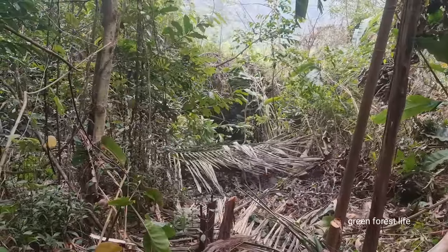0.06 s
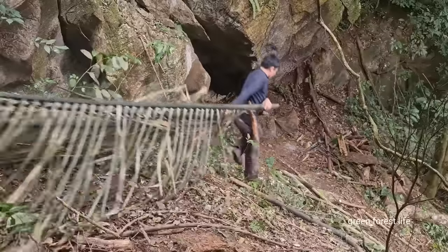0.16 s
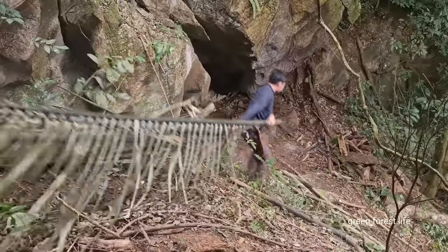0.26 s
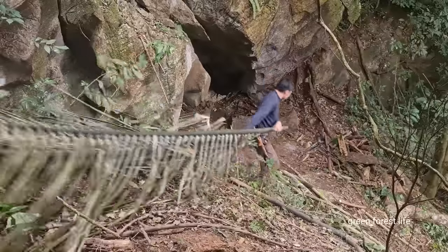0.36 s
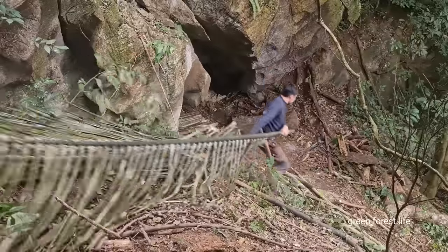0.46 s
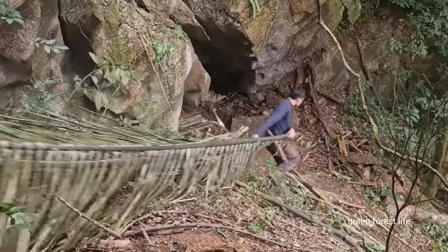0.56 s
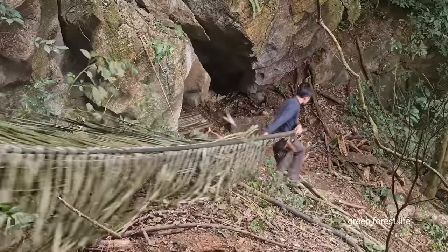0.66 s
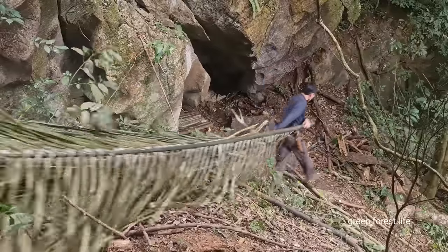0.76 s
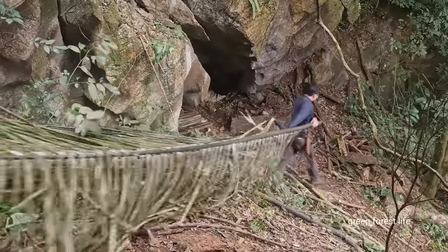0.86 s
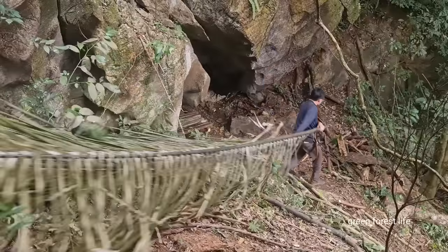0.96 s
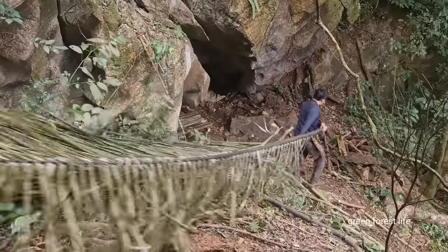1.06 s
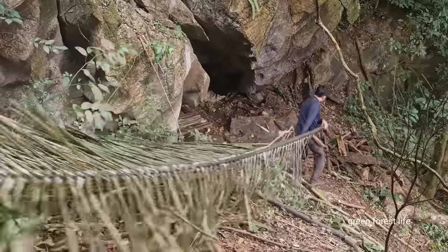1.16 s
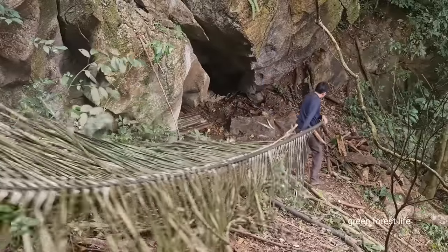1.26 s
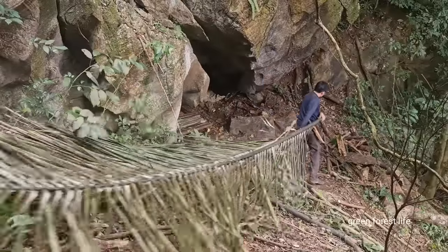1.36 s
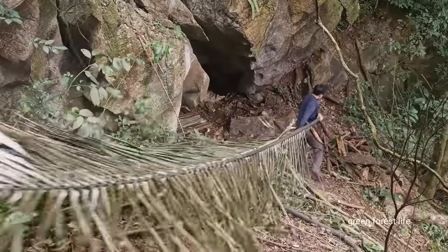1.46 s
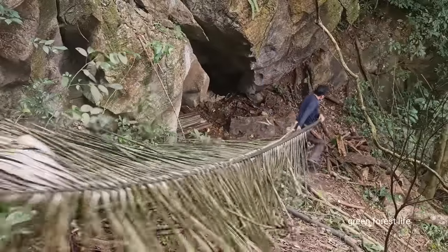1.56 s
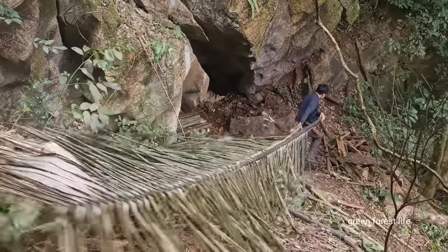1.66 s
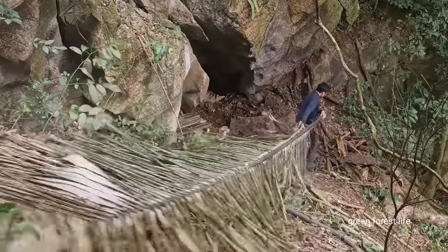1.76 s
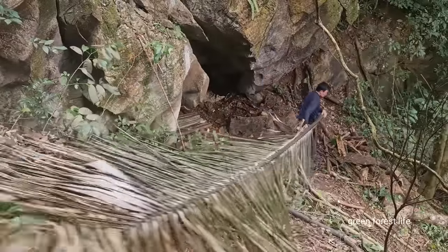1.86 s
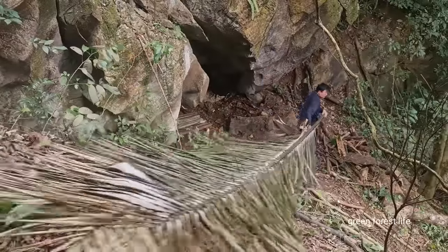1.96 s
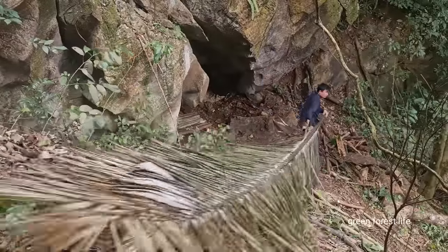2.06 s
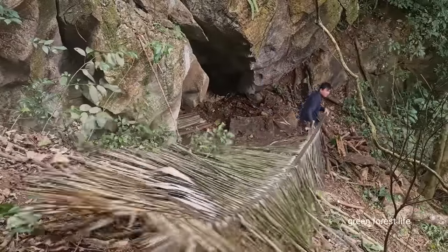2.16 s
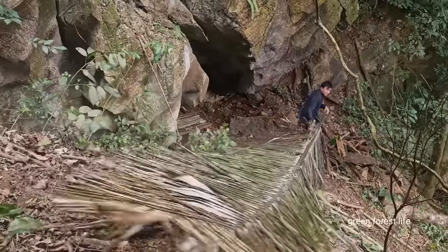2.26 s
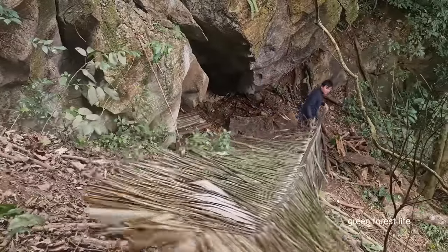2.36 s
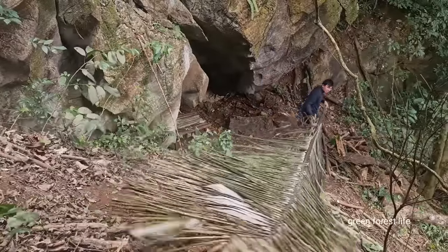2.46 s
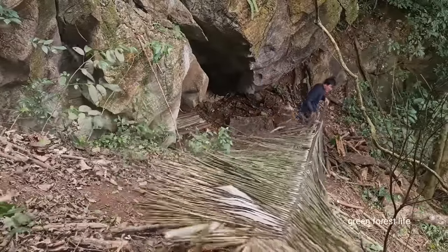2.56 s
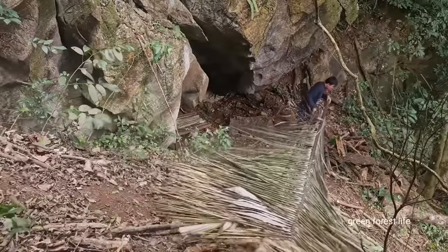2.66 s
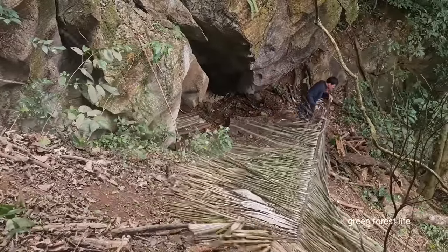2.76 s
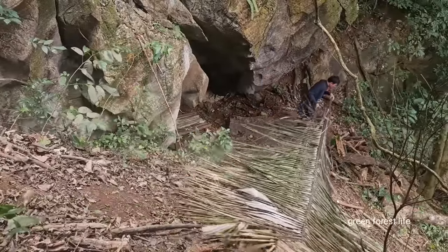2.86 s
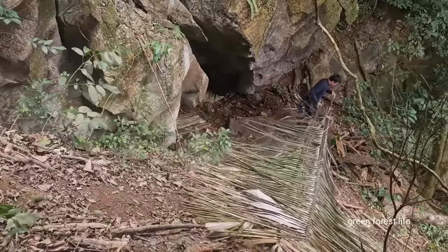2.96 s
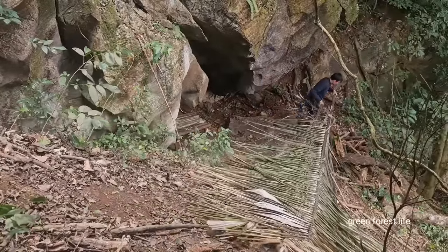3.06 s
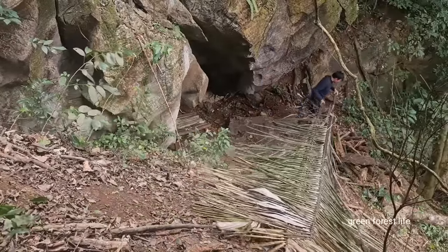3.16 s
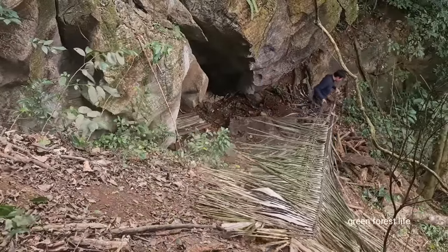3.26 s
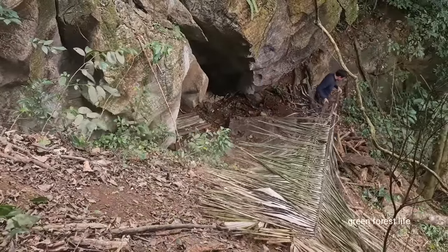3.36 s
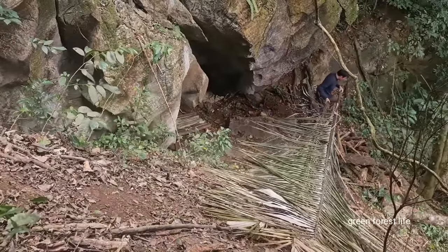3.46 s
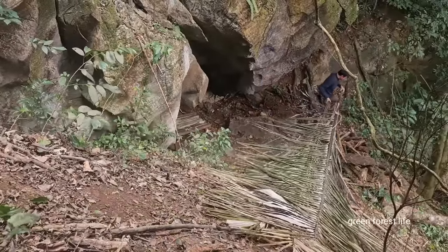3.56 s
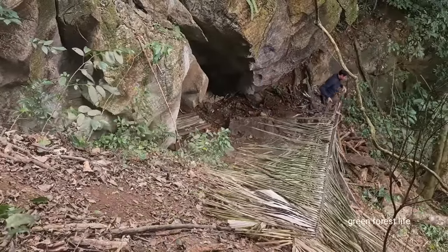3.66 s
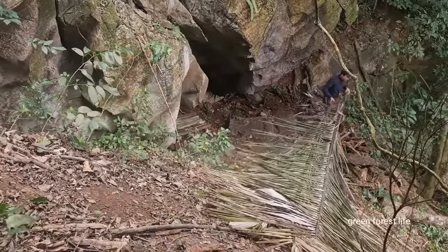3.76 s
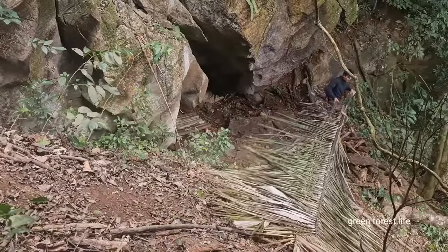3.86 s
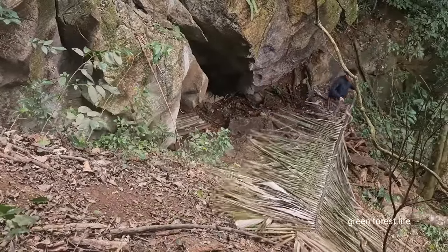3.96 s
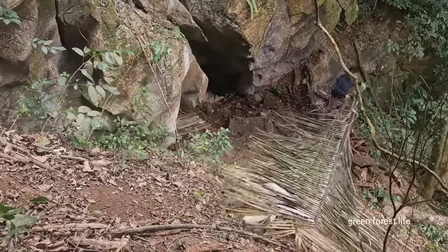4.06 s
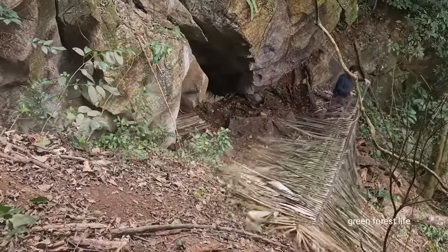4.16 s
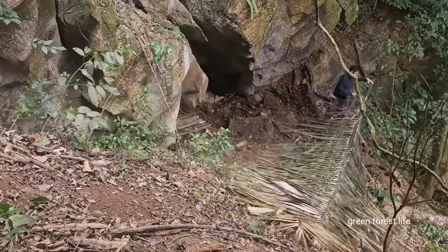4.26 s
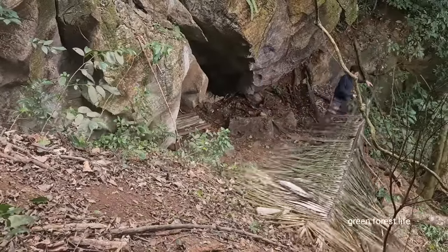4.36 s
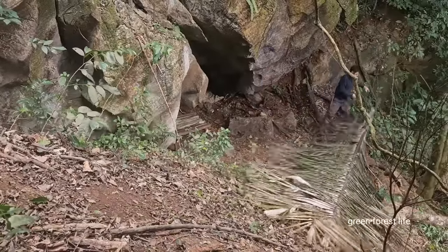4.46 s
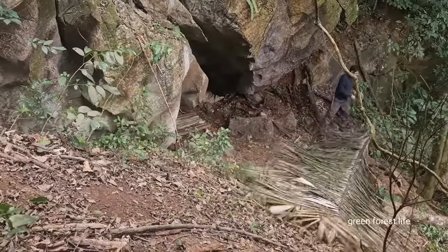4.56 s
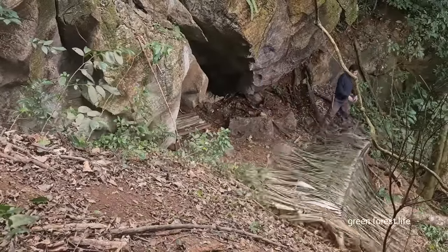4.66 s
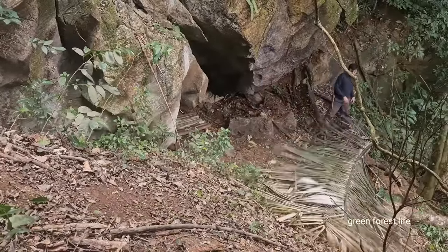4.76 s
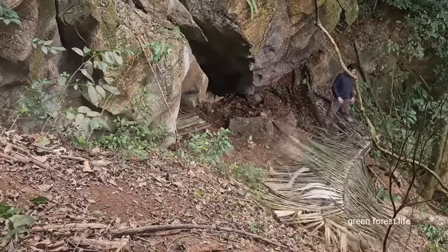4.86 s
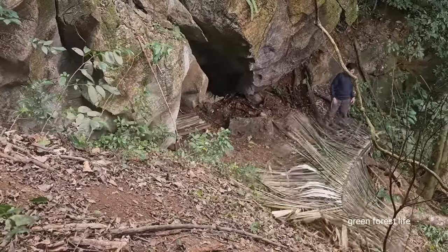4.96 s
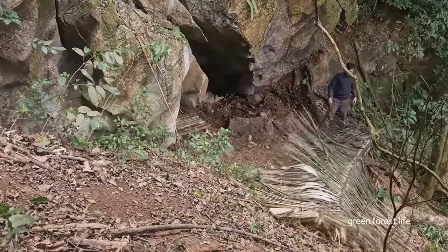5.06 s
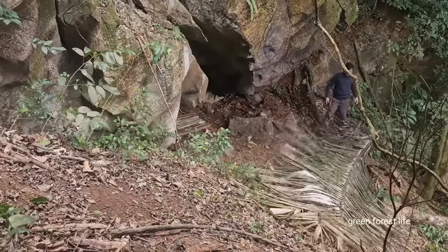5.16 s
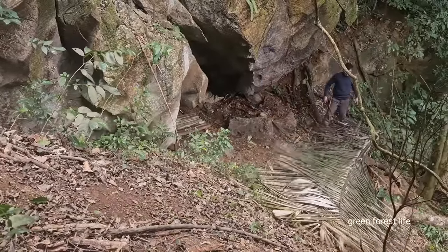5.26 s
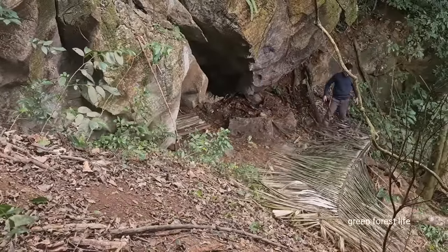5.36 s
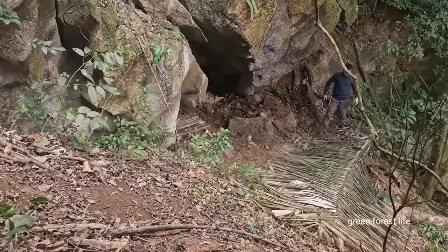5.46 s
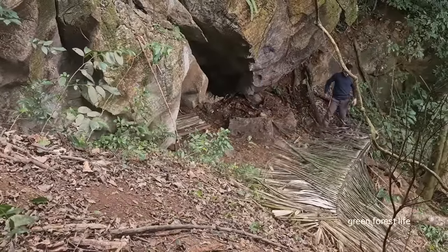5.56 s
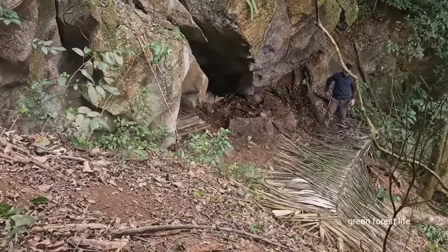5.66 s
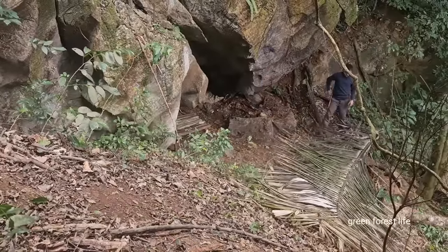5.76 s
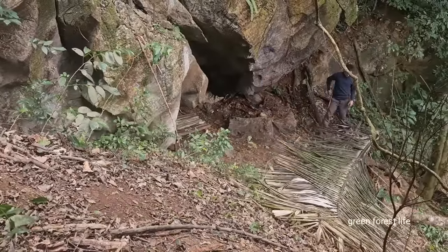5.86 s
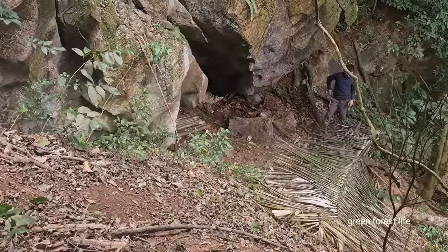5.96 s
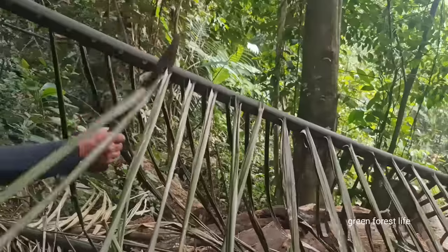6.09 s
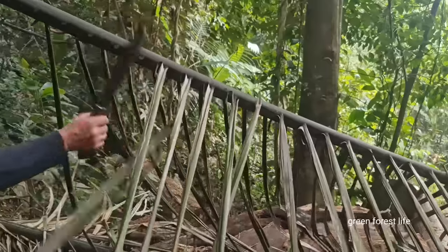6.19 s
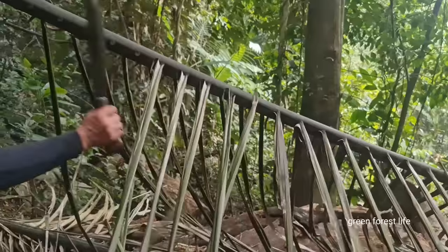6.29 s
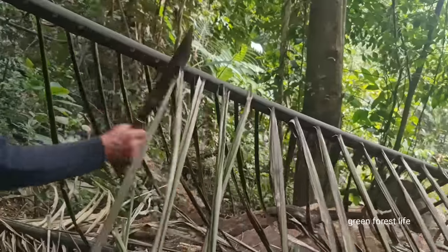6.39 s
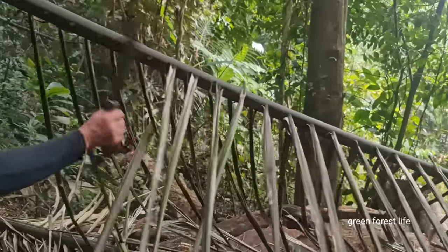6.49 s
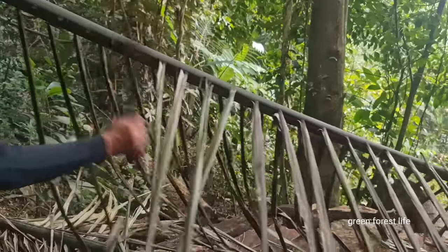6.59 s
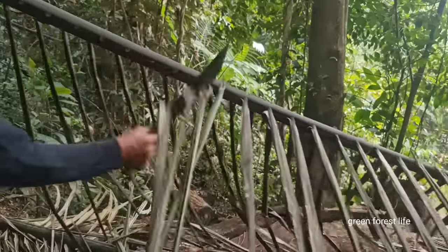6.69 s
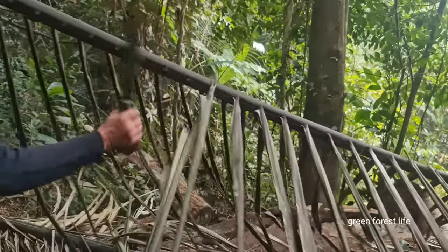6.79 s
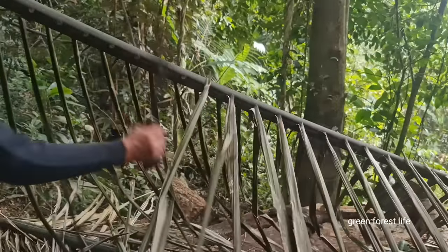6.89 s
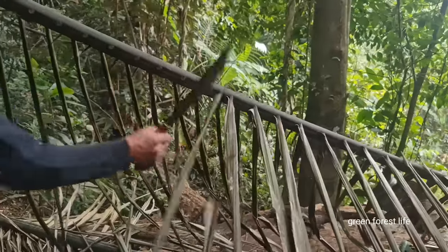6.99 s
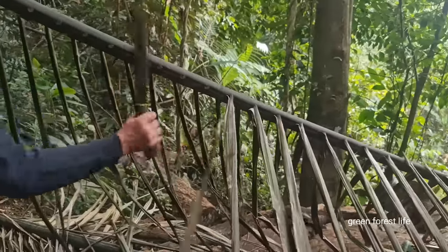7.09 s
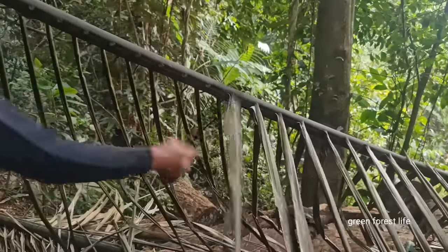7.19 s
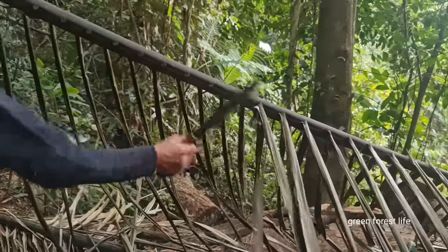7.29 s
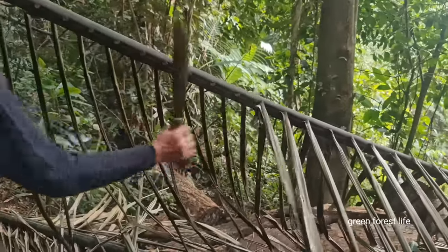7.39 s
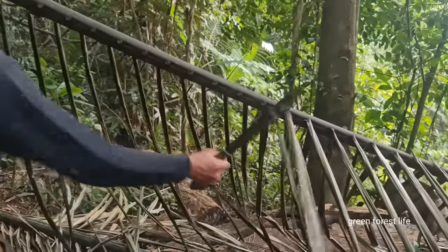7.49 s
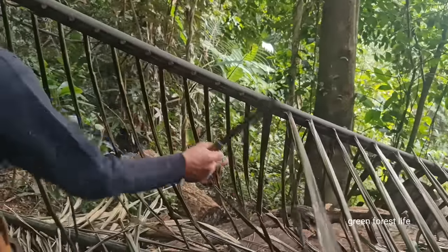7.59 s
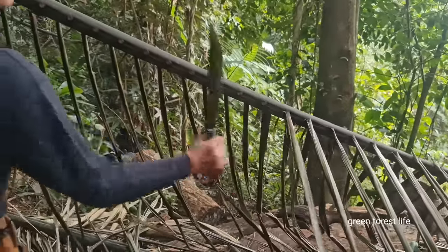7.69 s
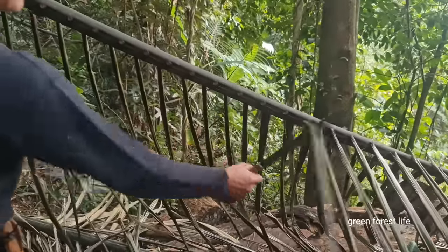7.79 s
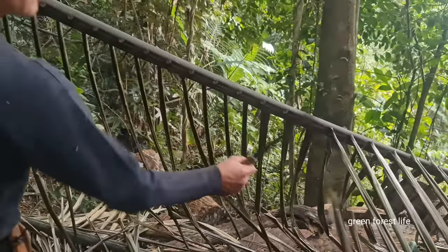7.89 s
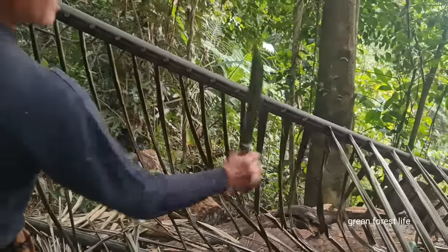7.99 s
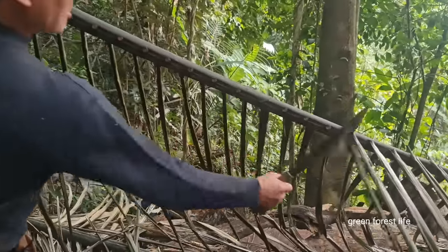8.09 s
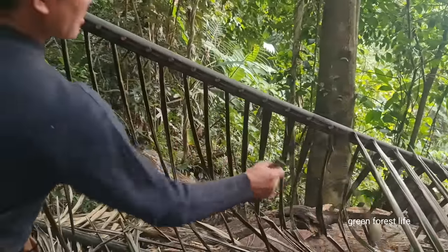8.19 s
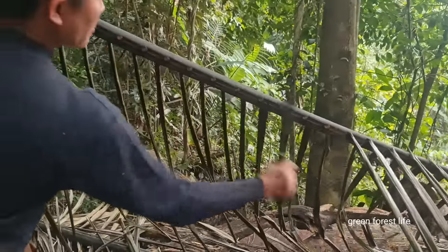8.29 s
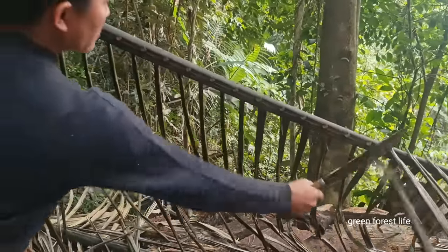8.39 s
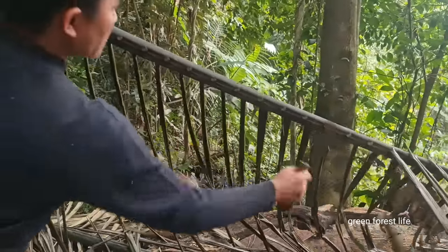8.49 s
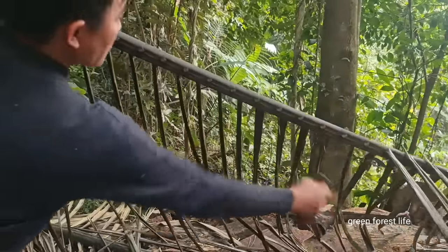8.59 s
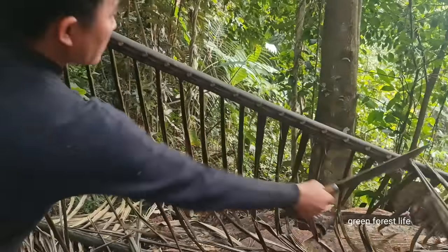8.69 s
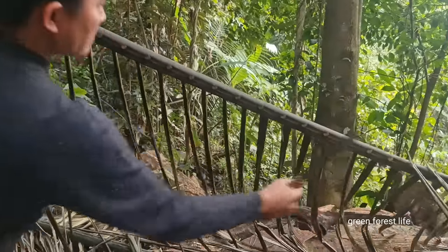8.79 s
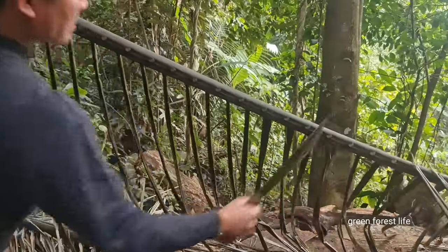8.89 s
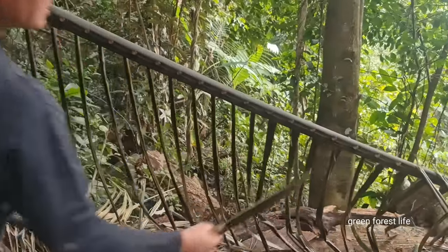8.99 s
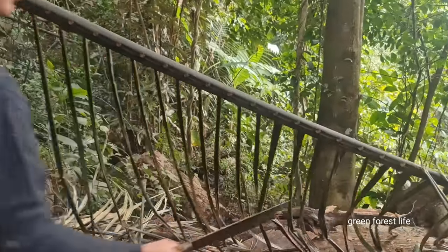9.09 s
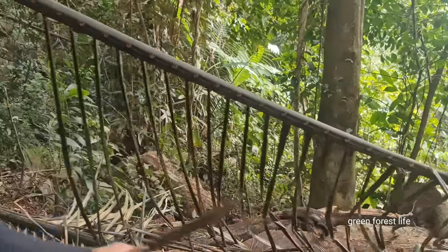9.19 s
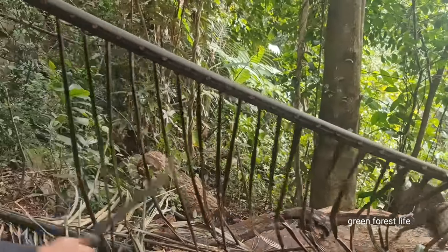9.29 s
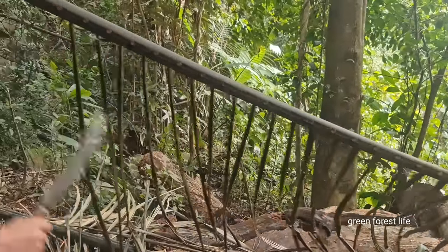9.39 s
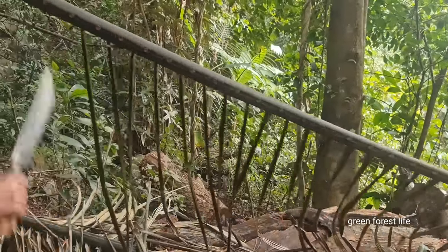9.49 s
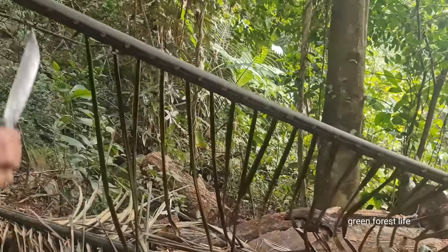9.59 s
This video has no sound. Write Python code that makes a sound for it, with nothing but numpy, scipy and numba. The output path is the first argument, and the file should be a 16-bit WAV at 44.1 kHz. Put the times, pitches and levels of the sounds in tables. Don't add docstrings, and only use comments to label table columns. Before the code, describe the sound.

A big dry palm frond is dragged rustling over leaf litter and fades away, then a machete rapidly chops leaflets off its rib close by.

```python
import sys
import numpy as np
from scipy import signal
from scipy.fft import rfft, irfft
from scipy.io import wavfile
from scipy.ndimage import uniform_filter1d
from numba import njit

SR = 44100
rng = np.random.default_rng(int(sys.argv[2]) if len(sys.argv) > 2 else 0)


def volts_from_db(level):
    exponent = np.asarray(level, float) / 20
    return 10 ** exponent


def store_wav(level_fs):
    pcm = np.round(np.clip(np.atleast_2d(level_fs), -1, 1) * 32767)
    wavfile.write(sys.argv[1], SR, pcm.T.astype(np.int16))


N = 425124
CLOSE_S = 6.2

# (tips level/dB, stems level/dB, soil level/dB)
FAR_SHARES = (-8, -12.5, -29.5)
NEAR_SHARES = (-7.5, -9.5, -24.5)


def rustle():
    t = np.arange(N) / SR
    pull, heavy = motion()
    close = np.arange(N) > CLOSE_S * SR
    tips_db, stems_db, soil_db = (np.where(close, near, far) for far, near in zip(FAR_SHARES, NEAR_SHARES))
    blows_end_s, resting_soil_db = 8.8, -37
    soil_db = np.where(np.arange(N) > blows_end_s * SR, resting_soil_db, soil_db)
    air_db_per_s = -0.28
    tips_db = tips_db + 10.0 + air_db_per_s * t * ~close - 1.5 * close

    blades = volts_from_db(-1.0) * litter(1118.0, 6840.0, 7.9, 0.31, 0.97, count=60000)
    tips = volts_from_db(tips_db) * litter(6400.0, 16900.0, 2.7, 0.26, 0.78, count=60000)
    stems = volts_from_db(stems_db + 2.5) * litter(218.0, 905.0, 20.5, 1.1, 0.13, count=10000)
    soil = volts_from_db(14.5) * litter(36.0, 210.0, 4.4, 0.6, 2.2, count=1500)
    landing = volts_from_db(-11.0) * close * litter(685.0, 4130.0, 26.0, 1.3, 4.4, count=4000)

    jerk = volts_from_db(0.5 * walk(rate=40))
    ground_db = -88
    soil_motion = np.hypot(heavy * volts_from_db(soil_db), volts_from_db(ground_db))
    return jerk * (pull * (blades + tips + landing) + heavy * stems + soil_motion * soil)


# (t/s, pull level/dB, weight of the rib on the ground level/dB)
DRAG = [(0.237, -43, -4), (0.254, -29, 1.5), (0.31, -21, 0.5), (0.55, -17.5, 2), (1.0, -22, 2),
        (1.8, -24.5, 0.5), (2.6, -27.5, -2.5), (3.0, -33, -0.5), (3.45, -38.5, 0.7), (3.66, -45, 0.5),
        (3.92, -33.5, -1), (4.27, -27, -2.5), (4.53, -29.5, -3), (4.68, -25, -3), (4.96, -40.5, -4),
        (5.3, -43, -6), (5.53, -58.5, 1.5), (6.0, -70, 4)]
# (peak t/s, level/dB, swell t60/s, fade t60/s,
# weight level/dB)
LEAF_SWELLS = [(6.206, -52, 0.011, 4.4, 7.5), (6.3, -41, 0.63, 0.6, -5), (8.025, -46, 0.014, 0.35, 3),
               (8.6, -43, .08, 0.37, -8), (7.72, -43, 0.05, 0.14, 7), (6.42, -32, 0.35, 1.37, -2.5),
               (6.64, -33.5, 0.29, 1.7, -1.5), (6.72, -41, .1, 1.6, -6), (6.92, -33, 1.2, 0.64, -7),
               (7.01, -28.5, 0.2, 0.07, -1.5), (7.104, -32.5, 0.44, 0.067, -4), (7.206, -39, 0.042, 1.2, 1),
               (7.29, -33, 0.16, 1.2, -3), (7.43, -34.5, 0.44, 0.95, 1), (7.58, -42, 0.17, 0.28, 11.5),
               (7.63, -35, 0.1, 0.25, 0.5), (7.75, -62, 1.1, 1.3, 11), (7.859, -27.5, 0.27, 0.2, 2),
               (7.93, -42.5, 0.11, 0.68, 4.5), (8.06, -45, 0.2, 3.1, -8), (8.16, -30, 0.5, 0.18, -2),
               (8.3, -46, 1.7, 0.64, 7), (8.45, -38, 0.12, 0.46, 6), (8.51, -36.5, 0.97, 0.21, -9),
               (8.65, -36.5, 0.37, 0.65, 4.5), (8.71, -41.5, .1, 0.84, 3), (8.78, -37.5, 1.2, .3, -12),
               (0.005, -36, 0.13, 0.51, -0.5), (0.16, -48, 1.5, 0.84, 1), (1.32, -23, 0.27, 0.16, -4),
         (3.505, -37, .03, 0.4, -2), (5.28, -42.5, .25, 0.18, 6), (5.4, -51, 0.084, 0.14, 7),
         (5.79, -64, 1, 0.34, -7), (6.074, -52, .02, 0.2, 11), (1.785, -25, 0.17, 0.38, 3),
         (5.225, -46, .2, 0.22, 5), (3.91, -33.5, 0.16, 0.14, 0), (8.93, -40.5, 0.22, 0.54, 4),
         (9.12, -47.5, 1.5, 0.46, -4), (9.33, -44, 1, 3, 2.5), (9.42, -41.5, 1.3, 5, 3.5),
         (9.62, -40.5, 1.6, 0.77, -11)]


def motion():
    t = np.arange(N) / SR
    s, pull_db, weight_db = np.transpose(DRAG)
    power = volts_from_db(2 * np.interp(t, s, pull_db, left=-90))
    heavy = power * volts_from_db(2 * np.interp(t, s, weight_db))
    for peak_s, level_db, swell, fade, weight_db in LEAF_SWELLS:
        rising = (peak_s - t) / max(swell, 0.01)
        fading = (t - peak_s) / max(fade, 0.01)
        shape = volts_from_db(2 * (level_db - 60 * np.where(t < peak_s, rising, fading)))
        shape = shape * ((t > CLOSE_S) | (peak_s < CLOSE_S))
        power = power + shape
        heavy = heavy + shape * volts_from_db(2 * weight_db)
    return np.sqrt(power), np.sqrt(heavy)


def litter(low_hz, high_hz, cycles, uneven_db, patchy_db, count):
    when, pitch = rng.random((2, count))
    hz = low_hz + (high_hz - low_hz) * pitch
    size = np.sqrt(hz) * volts_from_db(uneven_db * rng.exponential(size=count))
    x = cracks(when * N / SR, hz, cycles, size, 6.0, 6.5, rng.standard_normal((2, count)))
    x = x * volts_from_db(patchy_db * walk(rate=25))
    return x / x.std()


def walk(rate):
    k = SR // rate
    held = np.repeat(rng.standard_normal(N // k + 1), k)
    return np.sqrt(2) * uniform_filter1d(uniform_filter1d(held, k), k)[:N]


# (t/s, fibre level/dB, wood and knock of the rib relative to fibre level/dB)
STALKS = [(6.0762, -44, -10, -12), (6.384, -13, -2, -21), (6.393, -30.5, 14.5, 7),
          (6.4057, -16.5, -14, -5.5), (6.572, -29.5, 9, -3), (6.67, -22, 0, -4), (6.681, -14, 0, -4.5),
          (6.698, -18, 4.5, -12), (6.9864, -15, 0, -14), (7.002, -29, -10, -26), (7.254, -12, -4, -9.5),
          (7.272, -21.5, -2, -2), (7.421, -23.5, -1.5, -22), (7.539, -15, -6, -1.5), (7.5515, -14.5, 1, -9),
          (7.569, -35, 4, -10), (7.82, -22, 12.5, -7), (7.834, -11.5, -1, -8.5), (8.108, -25.5, -7, 4.5),
          (8.121, -17, -18, -0.5), (8.133, -15, -5, -2.5), (8.152, -35, -5, -13), (8.395, -15.5, 2.5, 0.5),
          (8.408, -16, 1, -3), (8.422, -21, 5, 3), (8.4407, -25.5, -23, -7), (8.6696, -10, 0, -11),
          (8.681, -13.5, -16, 3), (8.692, -26, 0, -12), (8.9458, -37.5, 0, -1)]
# (t/s, fibre level/dB, skin relative to fibre level/dB)
NICKS = [(6.3357, -40, 14), (6.365, -31, 12), (6.465, -37.5, 14.5), (6.595, -44, 12), (6.913, -33, 9),
         (6.946, -29, 5.5), (6.968, -28, 6), (7.03, -40, 11), (7.188, -50, 6), (7.786, -40, 10),
         (7.805, -29, 0), (8.022, -44, 8), (8.051, -46, 11), (8.088, -25.5, 0), (8.32, -49, 12),
         (8.485, -36.5, 9), (9.115, -48.5, 12.5), (9.125, -46, 11), (9.527, -34, 2), (9.5324, -33, 3),
         (9.556, -41, 2.5)]


def cuts():
    skin_db, stiff_loss = -1, 0.12
    stalk_rise_s, burst_db = 0.0013, -0.5
    stalks = [(s, db, wood, knock, skin_db - stiff_loss * wood, stalk_rise_s, burst_db)
              for s, db, wood, knock in STALKS]
    wood_db, knock_db, thin = 1, 2, 0.99
    nick_rise_s, nick_burst_db = 0.0031, -3.0
    nicks = [(s, db, wood_db - thin * skin, knock_db - thin * skin, skin, nick_rise_s, nick_burst_db)
             for s, db, skin in NICKS]
    return stalks + nicks


def chops(count):
    s, fibre_db, wood_db, knock_db, skin_db, rise, burst_db = np.transpose(cuts())[:, :, None]
    kind = np.arange(count) % 4
    low_hz, high_hz = np.array([[2660, 8530], [924, 2020], [7600, 15300], [273, 860]])[kind].T
    hz = low_hz + (high_hz - low_hz) * rng.random((len(s), count))
    cycles = np.array([9.2, 3.7, 3.15, 9.4])[kind] + 0 * s
    share_db = np.choose(kind, [0 * s + 3, wood_db - 0.5, skin_db + 18, knock_db - 4.0])
    share_db = share_db + 10 * np.log10(2 * hz / (low_hz + high_hz))
    splinter_t60_s = 0.067
    return splinters(s, hz, fibre_db + share_db - 1.5, cycles, splinter_t60_s, rise, burst_db, 1.2, 2.2)


def splinters(s, hz, level_db, cycles, t60, rise, burst_db, crowd, spread):
    order = 1.15 * rng.random(hz.shape) - 0.12
    lag, shade, uneven = np.moveaxis(rng.standard_normal((*hz.shape, 3)), 2, 0)
    t60 = np.clip(t60, 0.003, 0.3)
    after = 0.6 * t60 * np.maximum(order, 0) ** crowd
    early = np.maximum(-order, 0) / 0.12
    burst_s = 0.0058
    burst = burst_db * np.exp(-after / burst_s)
    size = volts_from_db(level_db + burst - 60 * after / t60 - 17.5 * early + 2.35 * uneven)
    when = s + after - rise * early
    chance = np.array([lag.ravel(), shade.ravel()])
    return cracks(when.ravel(), hz.ravel(), cycles.ravel(), size.ravel(), spread, 12.7, chance)


# (t/s, level/dB, ring f/Hz, broad crack relative level/dB)
TWIGS = [(0.126, -47, 6400, 3), (0.523, -17, 5000, 2), (0.56, -17, 3000, 0), (1.329, -23, 3620, -5),
         (1.621, -24, 3000, 0), (1.643, -23, 2800, 0), (1.682, -12, 6340, -6), (1.709, -23, 6500, -2),
         (1.786, -19, 3000, -1), (2.685, -16, 1690, -3), (3.031, -31, 1010, 6), (3.053, -30, 2150, -5),
         (3.118, -30, 2150, -11), (3.124, -28, 1350, -3), (3.13, -32, 2050, -11), (3.209, -32, 2600, -3),
         (3.262, -30, 6700, -4), (3.279, -31, 3200, -10), (3.401, -31, 6800, -3), (3.502, -30, 6800, -6),
         (3.731, -41, 5040, 5), (3.902, -32, 1300, -3), (4.443, -33, 2780, 10), (4.615, -24, 4050, 4),
         (5.045, -33, 5900, -5), (5.216, -41, 760, -12), (5.218, -41, 1400, -10), (5.234, -38, 726, -8),
         (5.25, -41, 1600, -8), (5.278, -36, 3130, -5), (5.298, -41, 1400, -6), (5.398, -46, 2500, -10),
         (5.408, -46, 700, -4), (5.447, -43, 1700, -12), (5.47, -43, 1740, -12), (5.483, -46, 1600, -12),
         (5.975, -49, 1650, -11), (5.992, -58, 1600, -5), (6.0765, -37, 7200, -8), (6.085, -48, 2300, -6),
         (6.106, -39, 11500, -10), (6.134, -60, 1800, -3), (7.058, -34, 1500, 5), (8.778, -32, 2900, -1),
         (8.954, -36, 4000, -8), (8.975, -29, 1470, -17), (9.109, -41, 1000, 5), (9.172, -41, 1300, 4)]
# (t/s, level/dB, ring f/Hz)
TAPS = [(6.216, -35, 816), (6.244, -32, 830), (6.45, -27, 5340), (6.491, -26, 5200), (6.619, -31, 1300),
        (6.6417, -26, 1390), (7.099, -32, 1900), (7.198, -37, 1800), (7.2372, -29, 1740),
        (7.3083, -31, 1830), (7.348, -34, 1430), (7.3668, -22, 2820), (7.395, -30, 1720),
        (7.5212, -23, 890), (7.621, -27, 1400), (7.719, -39, 3140), (8.023, -46, 4500), (8.054, -41, 6720),
        (8.2556, -35, 3100), (8.3774, -36, 730), (8.4835, -35, 6630), (8.636, -37, 1700),
        (8.914, -39, 1510), (9.006, -42, 4030), (9.063, -40, 6730), (9.486, -38, 1510), (9.544, -36, 1500),
        (7.616, -28.5, 2850), (7.635, -31, 1600), (7.755, -37, 1300), (7.901, -40, 3020),
        (6.282, -39, 1090), (6.323, -38, 4000)]
# (t/s, level/dB, ring f/Hz)
STUBS = [(6.39, -23, 800), (6.393, -23, 1800), (6.405, -20, 6130), (6.57, -31, 1520), (6.571, -23, 3620),
         (6.668, -17, 1720), (6.699, -23, 1800), (7.013, -24, 2700), (7.253, -25, 730), (7.28, -28, 560),
         (7.397, -30, 810), (7.43, -32, 800), (7.54, -17, 820), (7.555, -18, 754), (7.62, -33, 820),
         (7.82, -22, 780), (7.822, -15, 2270), (7.862, -22, 800), (8.086, -31, 450), (8.11, -13, 1000),
         (8.1193, -17, 5800), (8.268, -27, 451), (8.377, -27, 650), (8.405, -17, 595), (8.407, -17, 2110),
         (8.481, -28, 854), (8.488, -35, 1400), (8.668, -20, 600), (8.682, -18, 780), (8.691, -24, 6500),
         (8.948, -35, 800), (9.488, -42, 1450), (9.547, -39, 1450)]
# (t/s, level/dB, ring f/Hz)
SLAPS = [(1.6815, -18, 6000), (3.0305, -32, 1500), (6.3375, -31, 7000), (6.3845, -16, 7000),
         (6.406, -12, 6000), (6.6814, -16, 6500), (6.698, -20, 6500), (6.9876, -12.5, 4470),
         (7.187, -37, 11000), (7.2532, -15, 3900), (7.272, -21, 4000), (7.4207, -22, 4500),
         (7.5381, -7, 3080), (7.5528, -14, 4900), (7.833, -11, 5500), (8.1204, -12, 5600),
         (8.1337, -15, 5900), (8.3955, -19, 3500), (8.406, -15, 5000), (8.6685, -17, 3300),
         (8.9454, -24.5, 4000)]


def ticks(count):
    tap_crack_db, stub_db, stub_crack_db, slap_crack_db = -2, -0.5, -39, -1
    taps = [(*tap, tap_crack_db) for tap in TAPS]
    stubs = [(s, db + stub_db, hz, stub_crack_db) for s, db, hz in STUBS]
    slaps = [(*slap, slap_crack_db) for slap in SLAPS]
    s, level_db, ring_hz, crack_db = np.transpose(TWIGS + taps + stubs + slaps)[:, :, None]
    tick_t60_s, slap_t60_s, rise_s = 0.03, 0.006, 0.0015
    t60 = np.where(np.arange(len(s))[:, None] < len(s) - len(SLAPS), tick_t60_s, slap_t60_s)
    chance = rng.random((len(s), count))
    broad = np.arange(count) % 3 > 0
    hz = np.where(broad, 1200 + 13000 * chance ** 1.78, ring_hz * (0.838 + 0.32 * chance))
    flick_db = 10 * np.log10(hz / 2000) + np.where(broad, crack_db - 3.5, 1.5)
    return splinters(s, hz, level_db + flick_db - 3.5, 15.0 + 0 * hz, t60, rise_s, 0.1, 1.3, 1.8)


# (t/s, peak level/dB, f/Hz)
THUDS = [(0.329, -51, 61.9), (0.499, -38, 53.8), (1, -29, 67.3), (1.329, -37, 145), (2.398, -40, 180),
         (3.049, -36.5, 236), (3.101, -45, 70), (1.749, -42, 90), (4.45, -48, 150), (6.219, -52, 197),
         (4.618, -37, 224), (5.549, -60, 205), (5.62, -56, 75.4), (5.77, -63, 214), (6.679, -31, 222),
         (7.25, -38, 171), (7.539, -33, 130), (7.822, -41, 242), (8.108, -36, 199), (8.405, -29, 300),
         (8.68, -35, 333), (7.271, -38, 80), (4.7, -47, 70)]


def thuds():
    s, peak_db, hz = np.transpose(THUDS)
    size = volts_from_db(np.array([peak_db, peak_db]) + 11.0)
    return rings(np.array([s, s]) * SR, hz, 8.9 + 0 * hz, size)


# (t/s, left delay of short waves/samples, left delay of long waves/samples, left minus right level/dB)
BEARING = [(0, -21.5, -13, -0.5), (0.236, -20, 2, 0), (.245, -23.5, -20, 1.5), (.9, -23, -18, 1.5),
           (1.302, -15, -14, 0.5), (1.802, -12, -11.5, 1), (2.302, 5, -0.5, -1.5), (2.799, 6.5, 9, -1.5),
           (5.999, 7, 11, -2.5), (6.098, -7, -14.5, -0.5), (7.0, -3.5, -6.5, 1), (7.249, -1, 0.5, -0.5),
           (7.504, 4.5, 8.5, 0), (7.8, 5.5, 15, -2), (8.303, 8, 13.5, -1.5), (9.001, 12, 15.5, -2.5),
           (9.299, 22, 24, -3)]
# (f/Hz, stretch of their delay/ratio)
CREEP = [(150, 1.5), (260, 1.85), (390, 1.33), (520, 1.8), (700, 1.12), (1000, 0.88), (1400, 0.92),
         (1800, .85)]


def cracks(s, hz, cycles, size, spread, shade_db, chance):
    when, short, long, pan_db = np.transpose(BEARING)
    short_lag = np.interp(s, when, short)
    long_lag = np.interp(hz, *np.transpose(CREEP)) * np.interp(s, when, long)
    long_wave_hz, shaded_hz = 2124, 1800
    share = 1 / (1 + (hz / long_wave_hz) ** 6)
    lag = share * long_lag + (1 - share) * short_lag
    sidelong = np.minimum(short_lag / 21, 1) ** 2

    def near(centre_hz, width):
        return np.exp(-(np.log(hz / centre_hz) / width) ** 2)

    lag = lag + (1 - sidelong) * 19 * near(430, 0.4) * chance[1]
    lag = np.clip(lag + spread * np.minimum(hz / 2200.0, 1) ** 3 * chance[0] ** 3, -60, 60)
    lift_db, hollow_db = 4.5, -2
    size = size * volts_from_db(sidelong * (lift_db * near(1120, 0.26) + hollow_db * near(2050, 0.32)))
    side = np.array([[0.5], [-0.5]])
    shadow_db = shade_db * chance[1] * np.clip((hz / shaded_hz) ** 2, 0.15, 1)
    shade = volts_from_db(side * (np.interp(s, when, pan_db) + shadow_db))
    return rings(s * SR + side * lag, hz, cycles + 0 * hz, size * shade)


@njit
def rings(start, hz, cycles, size):
    out = np.zeros((2, N))
    for g in range(len(hz)):
        turn = (2j * np.pi - np.log(1000) / cycles[g]) * hz[g] / SR
        p = np.exp(turn)
        for c in range(2):
            first = max(int(start[c, g]) + 1, 0)
            z = -size[c, g] * turn / abs(turn) * np.exp(turn * (first - start[c, g]))
            for i in range(first, min(N, first + int(cycles[g] * SR / hz[g]))):
                out[c, i] += z.imag
                z *= p
    return out


def scatter(near):
    scatter_t60_s, scatter_db = 0.18, -13
    t = np.arange(SR // 4) / SR
    smear = rng.standard_normal((2, len(t))) * volts_from_db(-60 * t / scatter_t60_s) * (t > 0.001)
    smear = signal.sosfilt(signal.butter(4, 1700, "high", fs=SR, output="sos"), smear)
    smear = volts_from_db(scatter_db) * smear / np.sqrt(np.sum(smear ** 2) / 2)
    return signal.fftconvolve(near, smear, axes=1)[:, :N]


def first_spot(heard):
    spot_end_s, spot_hz, bass_db = 0.237, 600, -2.5
    thin = signal.sosfilt(signal.butter(6, spot_hz, "high", fs=SR, output="sos"), heard)
    bass = signal.sosfilt(signal.butter(4, 0.5 * spot_hz, fs=SR, output="sos"), heard)
    return np.where(np.arange(N) < spot_end_s * SR, thin + volts_from_db(bass_db) * bass, heard)


# (f/Hz, level/dB)
MIC = [(40, -25.5), (65, -16.5), (150, -12.5), (320, -9.5), (700, -3), (1000, -3), (1500, 0.5), (3000, 0),
       (5000, -2.5), (7000, -1.5), (7800, -7.5), (12500, -7.5), (14000, -11), (15500, -11)]
# (f/Hz, left minus right level/dB)
MISMATCH = [(300, -1), (480, 0.5), (1000, -0.5), (5000, 0), (6500, -3), (7500, -2), (9000, 3), (11500, -3),
            (14000, 2.5)]


def microphones(heard):
    pair = [colour(mic[None], [(hz, side * db) for hz, db in MISMATCH])[0]
            for mic, side in zip(heard, (0.5, -0.5))]
    return colour(np.array(pair), MIC)


def colour(x, points):
    hz, gain_db = np.transpose(points)
    grid_hz = np.linspace(1, SR / 2, 1025)
    log_gain = np.log(volts_from_db(np.interp(np.log(grid_hz), np.log(hz), gain_db)))
    cepstrum = irfft(log_gain)
    cepstrum[1:1024] *= 2
    cepstrum[1025:] = 0
    response = irfft(np.exp(rfft(cepstrum)))
    return signal.fftconvolve(x, response[None], axes=1)[:, :N]


# (f/Hz, level/dB per Hz)
FOREST = [(18, -25), (30, 8), (307, -12), (379, -11), (575, -12.5), (996, -22), (1400, -8.5), (6050, -13),
          (7800, -22.5), (15500, -33)]


def forest():
    hiss = rng.standard_normal((2, N))
    turned = signal.lfilter([-0.975, 1], [1, -0.975], -hiss[0])
    bass = signal.sosfilt(signal.butter(1, 500, fs=SR, output="sos"), turned - hiss[1])
    x = colour(np.array([hiss[0], hiss[1] + bass]), FOREST)
    return volts_from_db(-70) * x / x.std()


def scene():
    near = rustle() + ticks(count=75) + chops(count=320) + thuds()
    heard = first_spot(near + scatter(near))
    return microphones(heard) + forest()


def roll_off(x):
    return signal.sosfilt(signal.butter(12, 16820, fs=SR, output="sos"), x)


def record(dry):
    top = signal.ellip(7, 0.3, 44, 15450, fs=SR, output="sos")
    rumble_cut = signal.butter(2, 36, "high", fs=SR, output="sos")
    rounded = np.tanh(1.476 * dry) / 1.294
    return roll_off(signal.sosfilt(np.vstack([top, rumble_cut]), rounded))


dry = scene()
out = record(dry)
store_wav(out)
```